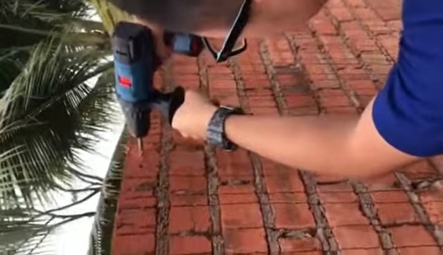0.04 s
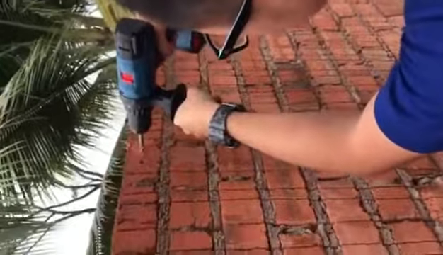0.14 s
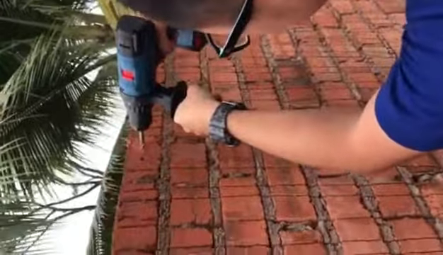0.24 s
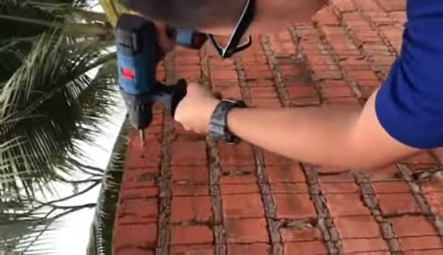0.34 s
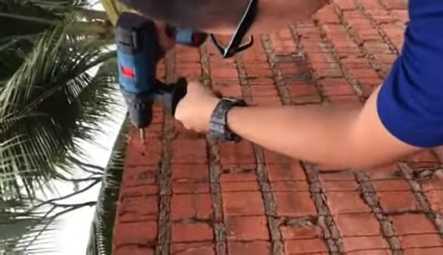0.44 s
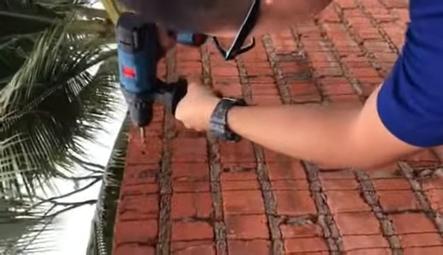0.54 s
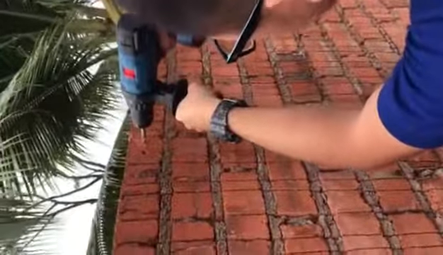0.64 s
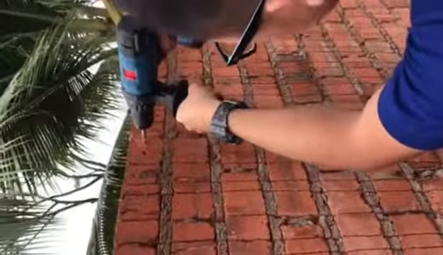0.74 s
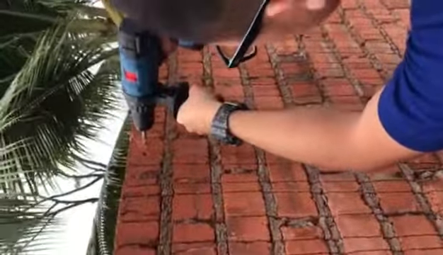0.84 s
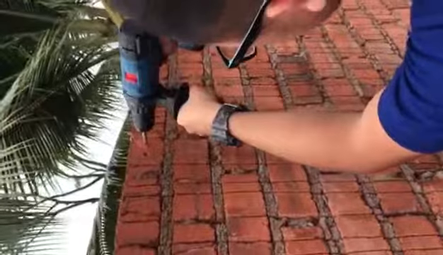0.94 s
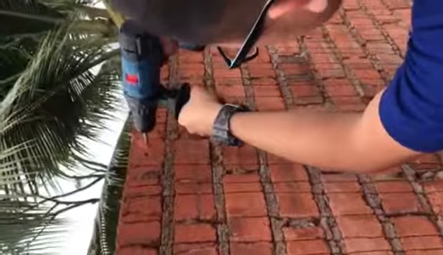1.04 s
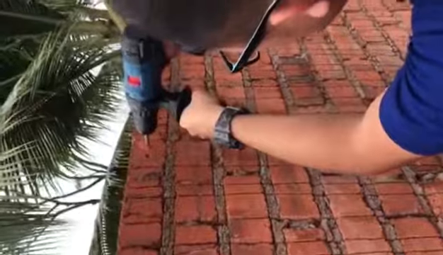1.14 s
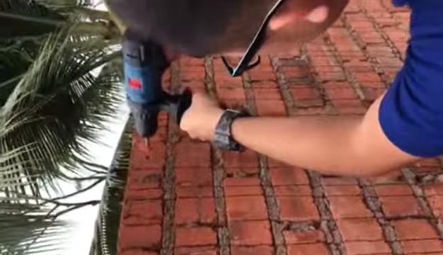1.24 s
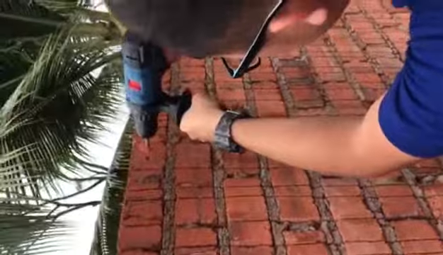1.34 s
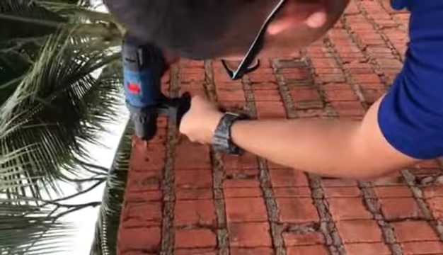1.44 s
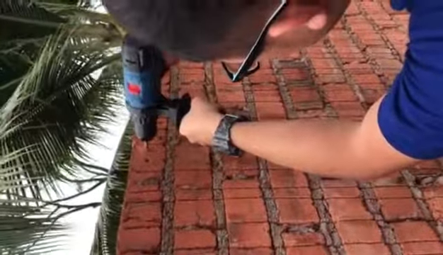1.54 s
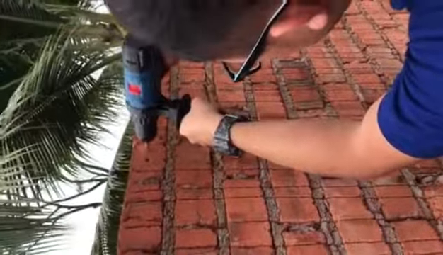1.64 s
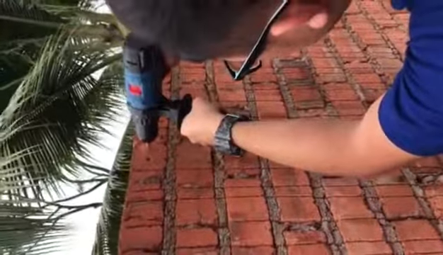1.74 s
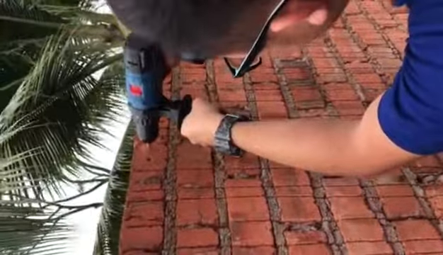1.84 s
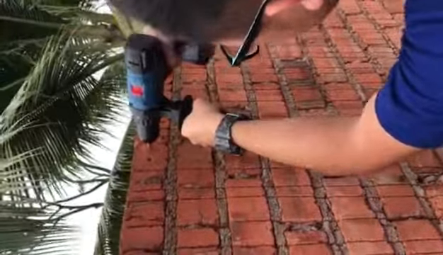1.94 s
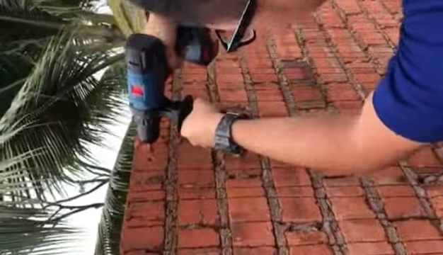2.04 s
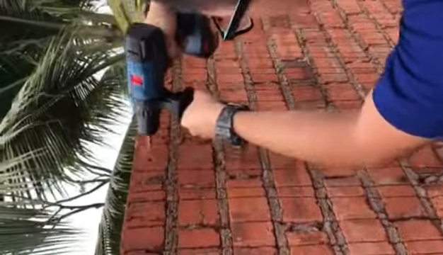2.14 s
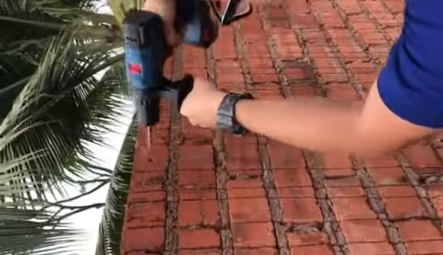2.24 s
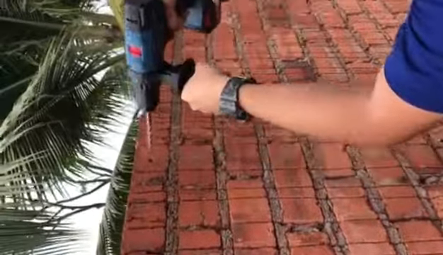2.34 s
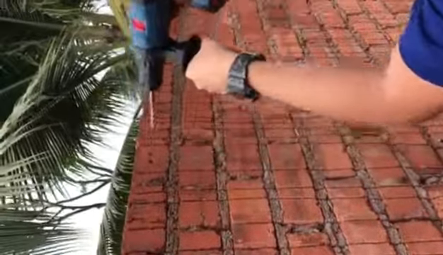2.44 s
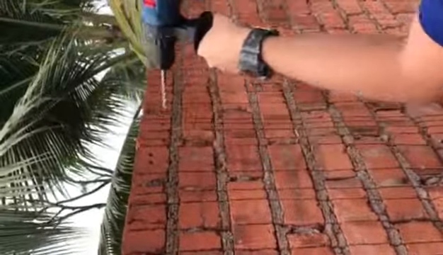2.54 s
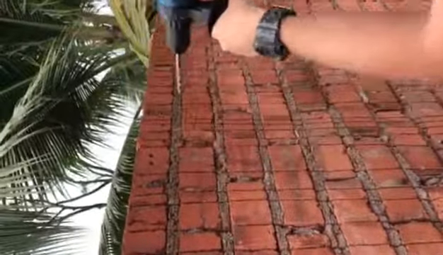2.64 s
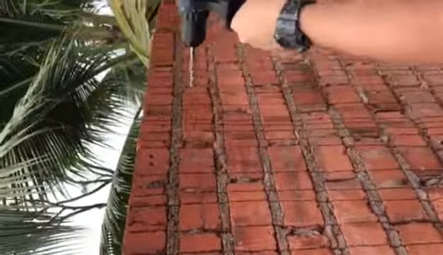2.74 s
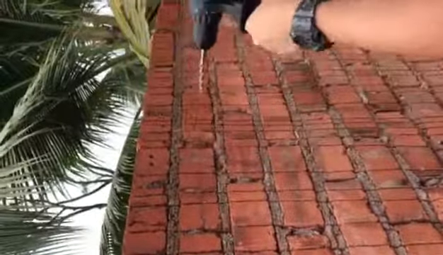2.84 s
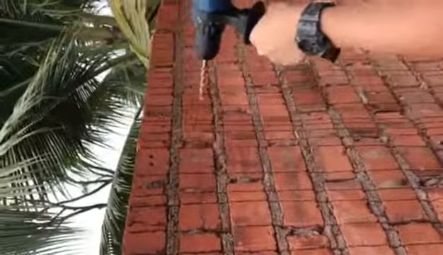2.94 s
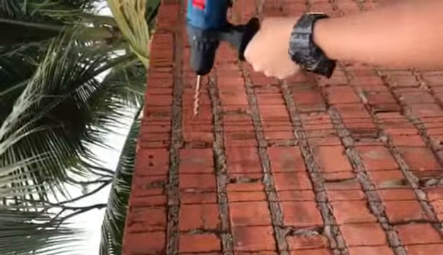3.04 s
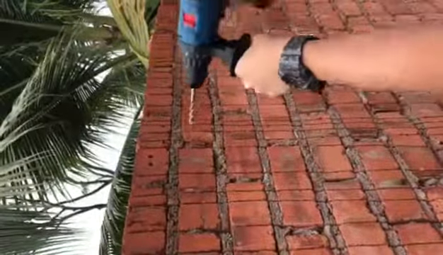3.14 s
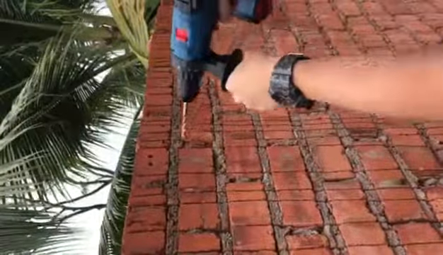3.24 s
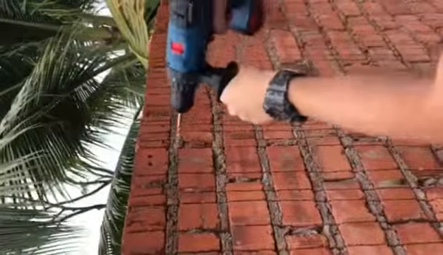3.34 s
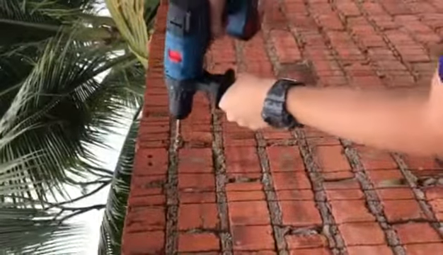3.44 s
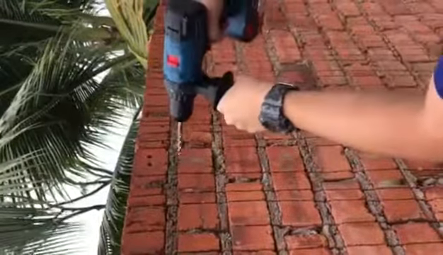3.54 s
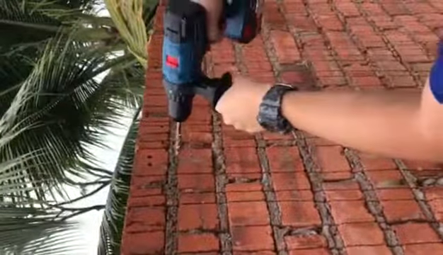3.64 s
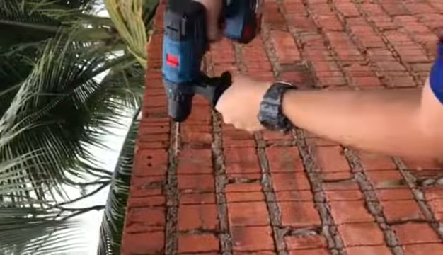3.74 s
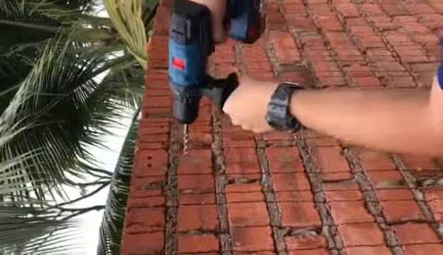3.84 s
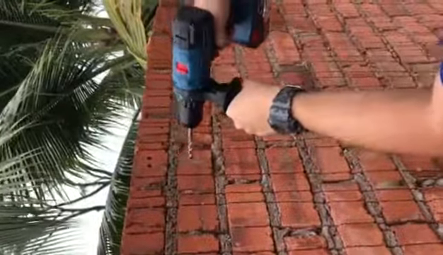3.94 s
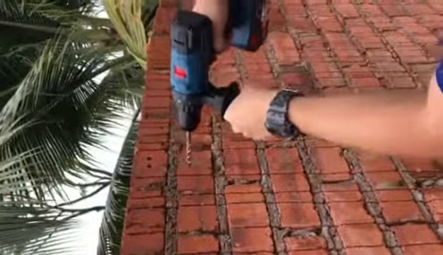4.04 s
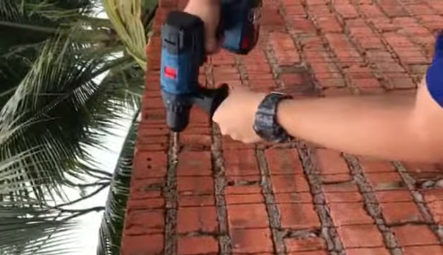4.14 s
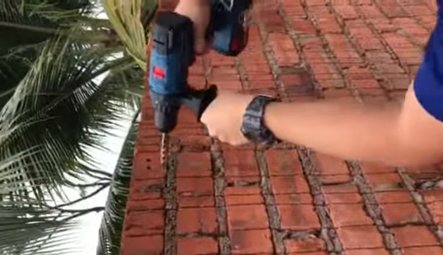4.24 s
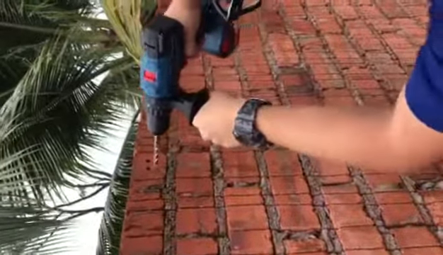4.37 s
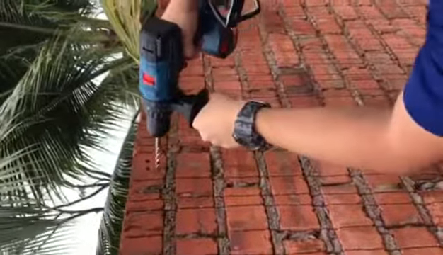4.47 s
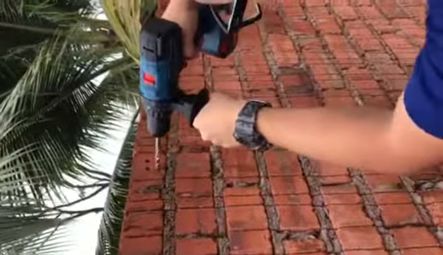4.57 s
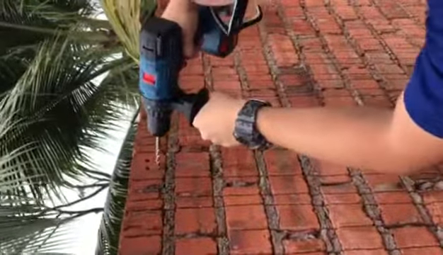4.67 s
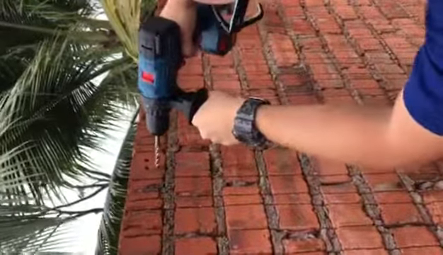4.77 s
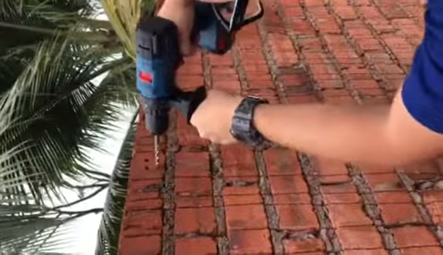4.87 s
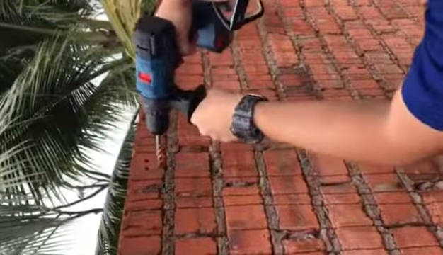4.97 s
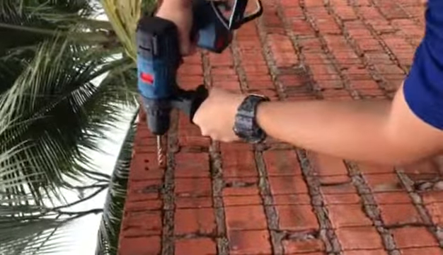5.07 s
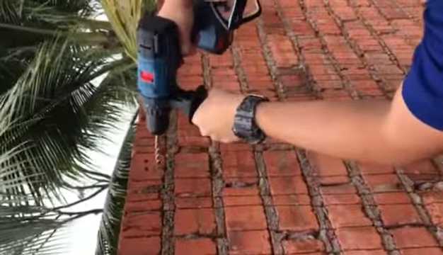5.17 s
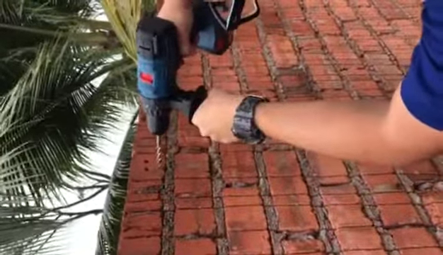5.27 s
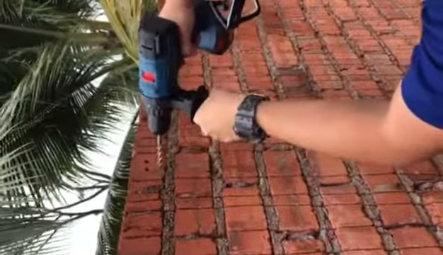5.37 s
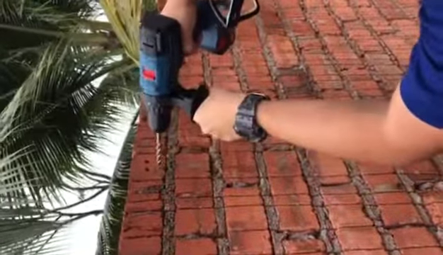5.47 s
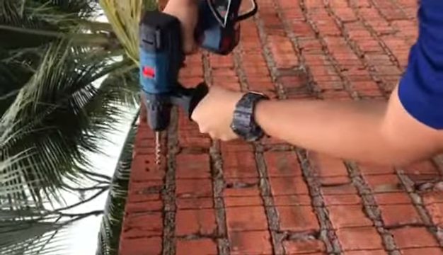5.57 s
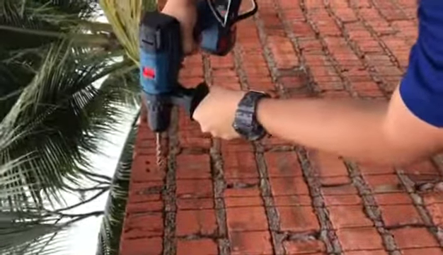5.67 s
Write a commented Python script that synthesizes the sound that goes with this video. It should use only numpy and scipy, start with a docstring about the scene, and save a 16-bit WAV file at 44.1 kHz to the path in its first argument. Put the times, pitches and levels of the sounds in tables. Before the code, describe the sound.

A cordless hammer drill buzzes roughly into brick, pulls free into a smooth high whine, brakes, then after scuffs and clicks whines again.

```python
"""A rough hammering buzz turns into a smooth whine, stops, and after scuffs and clicks the whine returns.
A cordless hammer drill bores into a brick wall outdoors, is pulled out spinning freely and brakes.
Then a shoe scuffs, the trigger clicks and the motor runs without load; a dull boom sounds before it stops.
Ratchet blows ring the drill body while the bit grinds brick. Running free, motor tones that follow the
shaft whine over the noisy rush of fan and gears. Scuff, knocks and boom are shaped noise."""
import sys
import numpy as np
from scipy import signal
from scipy.fft import rfft, irfft
from scipy.io import wavfile

SR = 44100
rng = np.random.default_rng(int(sys.argv[2]) if len(sys.argv) > 2 else 0)


def put_to_file(sound):
    """Save the sound as 16-bit audio at rate SR, in the file named by the first command-line argument."""
    columns = np.atleast_2d(sound).T  # one column per channel
    safe = np.clip(columns, -1, 1)
    whole_steps = np.round(safe * 32767)
    wavfile.write(sys.argv[1], SR, whole_steps.astype(np.int16))


N = 251811
TIME = np.arange(N) / SR

# Speed while the bit bores into the wall, first part. Each row: time in seconds, ratchet blows per second.
EARLY_BORING_SPEED = [(0.02, 608.3), (0.096, 606.3), (0.188, 596.9), (0.306, 600.9), (0.838, 604.7),
                      (1.09, 600.7)]
# Speed while the bit bores on, continuing the rows above. Each row: time in seconds, ratchet blows per second.
LATE_BORING_SPEED = [(1.21, 596.2), (1.33, 596.8), (1.402, 604.0), (1.538, 596.0), (1.728, 598.2),
                     (1.746, 595.1), (1.908, 598.9), (1.95, 603.0)]
# Speed without load, once the bit is pulled out. Each row: time in seconds, pitch of the whine in Hz.
PULLED_OUT_SPEED = [(2.09, 3931), (2.184, 3952), (2.248, 3919), (2.418, 3978), (2.55, 3971)]
# Speed without load in the second run. Each row: time in seconds, pitch of the whine in Hz.
FREE_RUN_SPEED = [(3.66, 3999), (4.998, 4023), (5.134, 3985), (5.48, 3989)]
# Runs of the motor. Each row: trigger pulled in seconds, brake bites in seconds,
# base level of the fan and gear noise in dB.
MOTOR_RUNS = [(-1, 2.621, -27.9), (3.358, 5.551, -28.7)]
# Ways the drill body rings under the blows. Each row: pitch in Hz, width in Hz, base level in dB.
BODY_MODES = [(660, 270, -9), (1250, 123, -0.6), (1787, 103, 0.6), (2462, 200, 2.4), (3044, 510, -3.3),
              (3780, 430, -4), (4200, 110, -8), (4530, 220, -15), (5250, 650, -10), (6050, 220, -10.5),
              (6620, 150, -12), (8420, 240, -13.5)]
# Ways the gearbox rings under the chatter. Each row: pitch in Hz, width in Hz, level in dB.
GEARBOX_MODES = [(1066, 220, -2.5), (1621, 48, 3.5), (2028, 330, -2), (2930, 67, -2.5), (3890, 160, -5)]
# Tones of the motor. Each row: multiple of the shaft speed, base level in dB against the whine.
MOTOR_TONES = [(10, 0), (15, -23), (16, -26.5), (17, -21), (20, -12.5), (22, -11.5), (28, -22), (29, -20),
               (30, -14), (32, -21), (33, -21.5), (34, -30), (40, -5)]
# Hum of the unbalanced rotor at full speed. Each row: multiple of the shaft speed, average level in dB.
ROTOR_TONES = [(1, -57), (2, -55), (3, -55), (4, -51.5)]
# The bit sings up while it spins free. Each row: middle in seconds, level in dB, half length in seconds.
SINGING_SWELLS_TABLE = [(2.19, -37, .11), (2.61, -46, .05), (3.55, -48, .06), (5.44, -46, .19)]
# Soft low bumps as the microphone is handled. Each row: start in seconds, level in dB,
# time to die away by 60 dB in seconds, centre in Hz, spread in octaves.
HANDLING_BUMPS = [(0.12, -36.5, 1, 77.4, 0.3), (0.12, -32, 0.42, 200, 0.51), (1.26, -38, 0.93, 85, 0.4),
                  (1.99, -34.5, 1, 253, 0.36), (2.16, -40, 0.9, 169, 0.3)]
# Knocks of bit, trigger, grip, shoe and gear backlash. Each row: start in seconds, level in dB,
# time to die away by 60 dB in seconds, centre in Hz, spread in octaves.
TOOL_KNOCKS = [(2.222, -29, .04, 5000, 1), (2.829, -43, .06, 2290, 0.37), (3.001, -35, 0.11, 1120, .4),
               (3.054, -32, 0.038, 1500, 0.88), (3.124, -29.5, 0.06, 6500, 1.5),
               (3.15, -33, 0.027, 4500, 1.8), (3.301, -38, .025, 6000, 1.5),
               (3.311, -42, 0.051, 1000, 0.46), (3.361, -22, 0.026, 2570, 0.95),
               (3.375, -20.5, 0.025, 1980, 0.86), (3.416, -32, .03, 3800, 1.2),
               (3.573, -30, 0.068, 810, 0.14)]
# A shoe shifts, then scuffs on gritty ground. Each row: start in seconds, attack in seconds,
# length in seconds, level in dB.
SHOE_SCUFFS = [(2.8, .04, .22, -55), (2.872, .03, .095, -45.5), (3.0, .003, .04, -46),
               (3.052, .003, .085, -34.3)]
# Colour of the grinding. Each row: frequency in Hz, strength in dB per Hz.
GRIND_SPECTRUM = [(60, -22), (170, -3.5), (500, -11), (900, -12), (1500, -6), (2300, 1.5), (2700, -2),
                  (3150, -1.5), (3450, 0), (3850, 5), (5100, -5.5), (6400, 1.2), (7600, -5.5),
                  (11000, -4.5), (14000, -11)]
# Colour of the fan and gears. Each row: frequency in Hz, strength in dB per Hz.
RUSH_SPECTRUM = [(100, -20.5), (550, -14), (850, -6.5), (1200, -3.8), (1450, -4.5), (2450, -3.5),
                 (3300, 0.5), (3800, 4), (4400, -1), (6200, -0.5), (7400, -9), (8700, -1.5), (10400, -10.5),
                 (13800, -2.5)]
# Colour of the scuff. Each row: frequency in Hz, strength in dB per Hz.
SCUFF_SPECTRUM = [(150, -13), (330, -10), (450, -5.5), (620, -6), (780, -13.5), (1100, -6), (1700, -8),
                  (2100, -11.5), (3300, -13.5), (7000, -20), (10000, -20), (13000, -20)]
# Colour of the boom. Each row: frequency in Hz, strength in dB per Hz.
BOOM_SPECTRUM = [(35, -20), (55, 6), (75, -11), (110, -8), (180, -15), (250, -7), (370, -11.5), (520, -19),
                 (750, -16), (950, -28), (3000, -51)]
# Colour of the outdoor rumble. Each row: frequency in Hz, strength in dB per Hz.
OUTDOOR_SPECTRUM = [(30, -19), (42, -19), (58, 3), (80, 0), (120, -8.5), (200, -16.5), (400, -24.5),
                    (850, -24), (1500, -27), (3000, -27), (6000, -34), (14000, -41)]

WHINES_PER_SHAFT_TURN, BLOWS_PER_SHAFT_TURN, BLOWS_PER_CHUCK_TURN = 10, 1.624, 18
CUTOFF_HZ = 14200
# the motor starts softly: time constant, and the power that bends the start into an S
SPIN_UP_S, SOFT_START = .063, 1.3
# as the trigger is let go the speed sags by a share; then the brake stops the shaft
EASE_S, EASE_SHARE, BRAKE_S = .062, .07, .02
# the bit leaves the bottom of the hole: the pressure has gone at LIFT_S, after fading for LIFT_FADE_S
LIFT_S, LIFT_FADE_S = 2.06, .13
# the ratchet hits harder when it runs faster than usual, and softer as the hole deepens
USUAL_BLOWS_PER_S = 600
HAMMER_DB, HAMMER_DB_PER_HZ, HAMMER_DB_PER_S = -18.1, .18, -.7
# grinding grows as the hole deepens
GRIND_DB, GRIND_DB_PER_S = -25.4, .9
# the bit skids once before it seats, and the blows turn irregular: middle and half length
SKID_S, SKID_WIDTH_S = .16, .06
# whine and rush are fainter just after the loud hammering and come up as the recorder's gain recovers
WHINE_DB, WHINE_AFTER_HAMMER_DB, GAIN_RECOVERY_S = -28.7, -7.5, .4
# the housing rings when the whine glides through its resonance
HOUSING_HZ, HOUSING_WIDTH_HZ, HOUSING_DB = 3810, 240, 6.5
# the dull boom: its start, and the deep note at its head (THUD_T60 is its time to die away by 60 dB, in s)
BOOM_S, THUD_HZ, THUD_DB, THUD_T60 = 5.032, 58, -29, .8


def from_db(db):
    """Turns decibels into a plain factor."""
    return 10 ** (np.asarray(db) / 20)


def rms_one(x):
    """Scales a signal to an rms (average strength) of 1."""
    return x / np.sqrt(np.mean(x ** 2) + 1e-20)


def curve(rows):
    """Joins rows of (seconds, value) by straight lines in time."""
    return np.interp(TIME, *np.transpose(rows))


def ramp(start, length):
    """Rises in a straight line from 0 to 1."""
    return np.clip((TIME - start) / length, 0, 1)


def swell(middle, half_length):
    """A smooth rise to 1 and fall."""
    return np.exp(-((TIME - middle) / half_length) ** 2)


def envelope(start, attack, length, t60):
    """Rises, holds until its length is over, then dies away by 60 dB in t60 seconds."""
    age_after_hold = np.maximum(TIME - start - length, 0)
    return ramp(start, attack) * np.exp(-np.log(1000) * age_after_hold / t60)


def drift(rate):
    """Wanders by chance, slower for a lower rate in Hz; rms 1."""
    hz = np.fft.rfftfreq(N, 1 / SR)
    return rms_one(irfft(rfft(rng.standard_normal(N)) / (1 + (hz / rate) ** 2), N))


def coloured(x, spectrum):
    """Shapes x by a spectrum that falls away below its first point; rms 1."""
    hz = np.maximum(np.fft.rfftfreq(N, 1 / SR), 1)
    points, level_db = np.transpose(spectrum)
    gain = from_db(np.interp(np.log(hz), np.log(points), level_db))
    gain = gain * np.minimum(1, hz / points[0]) ** 2
    return rms_one(irfft(rfft(x) * gain * (hz < CUTOFF_HZ), N))


def noise(spectrum):
    """Steady noise of the given colour."""
    return coloured(rng.standard_normal(N), spectrum)


def grains(per_s, spread_db):
    """Random clicks of uneven size; rms 1."""
    sizes = from_db(spread_db * np.minimum(rng.exponential(1, N), 4))
    signed_sizes = sizes * rng.choice([-1, 1], N)
    return rms_one(signed_sizes * (rng.random(N) < per_s / SR))


def resonance(x, hz, width):
    """Rings at one pitch: a two-pole band-pass with gain 1 on top."""
    r = np.exp(-np.pi * width / SR)
    feed = np.array([1, 0, -1]) * (1 - r * r) / 2
    return signal.lfilter(feed, [1, -2 * r * np.cos(2 * np.pi * hz / SR), r * r], x)


def bursts(events, rise=0.00061):
    """Short rattles in one band each, that start sharply and die away."""
    out, hz = np.zeros(N), np.maximum(np.fft.rfftfreq(SR, 1 / SR), 1)
    age = TIME[:SR]
    for s, db, t60, centre, spread in events:
        band = np.exp(-.5 * (np.log2(hz / centre) / spread) ** 2)
        rattle = rms_one(irfft(rfft(rng.standard_normal(SR)) * band, SR))
        shape = (1 - np.exp(-age / rise)) * np.exp(-np.log(1000) * age / t60)
        start = round(s * SR)
        out[start:start + SR] += (from_db(db) * shape * rattle)[:N - start]
    return out


def loaded_speed():
    """Rows of (seconds, ratchet blows per second) while the bit is in the wall."""
    return list(EARLY_BORING_SPEED) + list(LATE_BORING_SPEED)


def full_speed():
    """Shaft turns per second at full trigger: geared to the ratchet, faster once the load is gone."""
    loaded = [(s, blows / BLOWS_PER_SHAFT_TURN) for s, blows in loaded_speed()]
    free_rows = list(PULLED_OUT_SPEED) + list(FREE_RUN_SPEED)
    free = [(s, hz / WHINES_PER_SHAFT_TURN) for s, hz in free_rows]
    return curve(loaded + free)


def throttle(on, off):
    """Share of full speed in one run: spin-up, sag as the trigger is let go, braking."""
    spin_up = 1 - np.exp(-(np.maximum(TIME - on, 0) / SPIN_UP_S) ** SOFT_START)
    sag = 1 - EASE_SHARE * ramp(off - EASE_S, EASE_S) ** 2
    return spin_up * sag * np.exp(-(np.maximum(TIME - off, 0) / BRAKE_S) ** 2)


def shaft_angle(speed, flutter=0.00062):
    """The shaft turns at the given share of full speed, with a slight flutter."""
    return 2 * np.pi * np.cumsum(speed * full_speed() * (1 + flutter * drift(40))) / SR


def drill_body(blows, travel_s=.0003, grip_db=1.0):
    """Blows ring the modes of the body; rms 1."""
    out = 0
    for hz, width, db in BODY_MODES:
        # bending waves in the body: low modes arrive later (travel_s holds at 1 kHz)
        late = travel_s * np.sqrt(10 ** 3 / hz) * SR
        ringing = np.pad(resonance(blows, hz, width), (int(late), 0))[:N]
        # grip and pressure damp each mode a little differently from moment to moment
        out = out + from_db(db + grip_db * drift(3.7)) * ringing
    return rms_one(out)


def ratchet_blows(teeth, bite, uneven_db=1.85, lag_s=.000017, jitter_s=.000009,
                  skid_db=3.5, skid_loss_db=3.0, skid_s=.00006):
    """Ratchet teeth strike the body one after another, unevenly and not quite on time."""
    tooth = np.arange(1, int(teeth[-1]) - 2)
    chance = rng.standard_normal((N, 2))[tooth]
    skid = np.interp(tooth, teeth, swell(SKID_S, SKID_WIDTH_S))
    # the changing drag makes the blows come early and late in turn
    late = lag_s * np.cos(2 * np.pi * tooth / BLOWS_PER_CHUCK_TURN)
    late = late + (jitter_s + skid_s * skid) * chance[:, 0]
    at = np.clip(np.interp(tooth, teeth, np.arange(N)) + late * SR, 0, N - 2)
    force = from_db((uneven_db + skid_db * skid) * chance[:, 1] - skid_loss_db * skid)
    # a blow that falls between two samples is shared by both
    whole, part = at.astype(int), at % 1
    blows = np.bincount(whole, force * (1 - part), N) + np.bincount(whole + 1, force * part, N)
    return blows * bite


def hammer(wobble_db=1.0, flutter=0.002, grit_pulsing=0.22, crumble_db=-0.75):
    """Ratchet blows ring the body while the bit crushes brick, until the pressure is gone."""
    teeth = np.cumsum(full_speed() * BLOWS_PER_SHAFT_TURN * (1 + flutter * drift(24.9))) / SR
    chuck = 2 * np.pi * teeth / BLOWS_PER_CHUCK_TURN
    # the two cutting edges bite harder once and twice in each turn of the chuck
    bite = from_db(wobble_db * (np.sin(chuck) + 0.62 * np.sin(2 * chuck)))
    buzz = drill_body(ratchet_blows(teeth, bite))
    buzz = buzz / buzz[TIME < LIFT_S].std()
    extra_blows = curve(loaded_speed()) - USUAL_BLOWS_PER_S
    buzz_db = HAMMER_DB + HAMMER_DB_PER_HZ * extra_blows + HAMMER_DB_PER_S * TIME
    crushing = grains(14000, 2.5) * bite * (1 + grit_pulsing * np.sin(2 * np.pi * teeth))
    grind = coloured(crushing * from_db(crumble_db * drift(90)), GRIND_SPECTRUM)
    grind_db = GRIND_DB + GRIND_DB_PER_S * TIME
    pressure = 1 - ramp(LIFT_S - LIFT_FADE_S, LIFT_FADE_S)
    return pressure * (from_db(buzz_db) * buzz + from_db(grind_db) * grind)


def motor(angle, speed, speed_power=2.0, lag_s=.058, fade_in_s=.035,
          shimmer_db=0.4, overtone_shimmer_db=2.6, swell_db=2.0):
    """Under power the commutator whines at ten times the shaft speed, with weaker tones around it."""
    power = sum(envelope(on + lag_s, fade_in_s, off - on - lag_s, .02) for on, off, _ in MOTOR_RUNS)
    recovery_db = WHINE_AFTER_HAMMER_DB * (1 - ramp(LIFT_S, GAIN_RECOVERY_S))
    # distance of the whine from the housing's resonance, in half widths
    detuning = 2 * (WHINES_PER_SHAFT_TURN * speed * full_speed() - HOUSING_HZ) / HOUSING_WIDTH_HZ
    tones = 0
    for multiple, db in MOTOR_TONES:
        order = round(multiple)
        if order == WHINES_PER_SHAFT_TURN:
            housing_db = HOUSING_DB / (1 + detuning ** 2)
            gain = speed ** speed_power * from_db(db + housing_db + shimmer_db * drift(8.7))
        else:   # the weaker tones swell and fade slowly, each by chance
            gain = from_db(db + overtone_shimmer_db * drift(16) + swell_db * drift(0.88))
        tones = tones + gain * np.sin(order * angle + rng.uniform(0, 2 * np.pi))
    return np.sqrt(2) * from_db(WHINE_DB + recovery_db) * power * tones


def fan_and_gears(angle, speed_power=.55, after_hammer_db=-3.5, recovery_s=.15, strain_db=3.0, strain_s=.16,
                  throb=0.31, rattle_db=-1.0):
    """Air and gear chatter pulse twice in each shaft turn and ring the gearbox, louder at each start."""
    level = 0
    for on, off, db in MOTOR_RUNS:
        level = level + throttle(on, off) ** speed_power * from_db(db + strain_db * swell(on, strain_s))
    level = level * from_db(after_hammer_db * (1 - ramp(LIFT_S, recovery_s)))
    chatter = grains(20000, 2.1) * (1 + throb * np.sin(2 * angle)) * from_db(rattle_db * drift(80))
    ringing = sum(from_db(db) * resonance(chatter, hz, width) for hz, width, db in GEARBOX_MODES)
    return level * coloured(chatter + ringing, RUSH_SPECTRUM)


def singing(speed, ring_hz=770, wander=0.0127, waver_db=2.5, steady_db=-60):
    """One narrow mode of the bit, shaken by the gears: a faint wavering tone that swells at times."""
    turns = np.cumsum(ring_hz * (1 + wander * drift(39))) / SR
    swells = sum(from_db(db) * swell(s, half) for s, db, half in SINGING_SWELLS_TABLE)
    level = np.sqrt(speed) * (from_db(steady_db) + swells)
    return level * from_db(waver_db * drift(29)) * np.sqrt(2) * np.sin(2 * np.pi * turns)


def rotor(angle, speed, waver_db=1.5):
    """The unbalance hum of the free rotor grows steeply with speed."""
    running = ramp(LIFT_S, LIFT_FADE_S) * speed ** 4
    hum = 0
    for multiple, db in ROTOR_TONES:
        hum = hum + from_db(db + waver_db * drift(24)) * np.sin(round(multiple) * angle)
    return np.sqrt(2) * running * hum


def brushes(centre_hz=13000, start_db=-30, start_lag_s=.04, start_t60=.3, start_octaves=.21,
            brake_db=-12, brake_t60=.039, brake_octaves=.45):
    """The brushes spit when the brake bites and fizz under the starting current."""
    brakes = [(off, brake_db, brake_t60, centre_hz, brake_octaves) for _, off, _ in MOTOR_RUNS]
    # a run already going at time 0 has no start to hear
    starts = [(on + start_lag_s, start_db, start_t60, centre_hz, start_octaves)
              for on, _, _ in MOTOR_RUNS if on > 0]
    return bursts(starts, rise=.005) + bursts(brakes, rise=.00065)


def scuff(release_t60=.11):
    """Grit slips under a sole: a crowd of tiny clicks."""
    level = 0
    for s, attack, length, db in SHOE_SCUFFS:
        level = level + from_db(db) * envelope(s, attack, length, release_t60)
    return level * coloured(grains(5000, 2.1), SCUFF_SPECTRUM)


def boom(rumble_db=-25, attack_s=.008, hold_s=.06, t60=.7, tail_db=-42, tail_s=.46, tail_t60=.4,
         slap_db=-29, slap_t60=.25, slap_hz=1500, slap_octaves=2.2):
    """A slap and a deep thud, with a rumble that leaves a low tail."""
    age = np.maximum(TIME - BOOM_S, 0)
    thud = np.sin(2 * np.pi * THUD_HZ * age) * envelope(BOOM_S, attack_s, 0, THUD_T60)
    rumble_level = from_db(rumble_db) * envelope(BOOM_S, attack_s, hold_s, t60)
    tail_level = from_db(tail_db) * envelope(BOOM_S, attack_s, tail_s, tail_t60)
    rumble = (rumble_level + tail_level) * noise(BOOM_SPECTRUM)
    slap = bursts([(BOOM_S, slap_db, slap_t60, slap_hz, slap_octaves)], rise=.003)
    return slap + from_db(THUD_DB) * thud + rumble


def yard(x, t60=0.065, wet_db=-15):
    """Wall and ground scatter a short tail."""
    age = TIME[:SR // 3]
    tail = rng.standard_normal(len(age)) * np.exp(-np.log(1000) * age / t60) * (age > .004)
    return x + from_db(wet_db) * signal.fftconvolve(x, tail / np.linalg.norm(tail))[:N]


def scene(outdoors_db=-46):
    """Drill and feet close by, over the rumble of distant traffic; both channels are alike."""
    speed = sum(throttle(on, off) for on, off, _ in MOTOR_RUNS)
    angle = shaft_angle(speed)
    drill = hammer() + motor(angle, speed) + fan_and_gears(angle)
    drill = drill + singing(speed) + rotor(angle, speed) + brushes()
    knocks_and_feet = bursts(TOOL_KNOCKS) + scuff()
    microphone_bumps = bursts(HANDLING_BUMPS, rise=0.011)
    far = boom() + from_db(outdoors_db) * noise(OUTDOOR_SPECTRUM)
    mono = yard(drill + knocks_and_feet) + microphone_bumps + far
    return np.array([mono, mono])


def record(dry, top=0.6):
    """The tallest peaks are rounded and the highest treble is cut steeply."""
    rounded = dry / (1 + (dry / top) ** 4) ** (1 / 4)
    treble_cut = signal.ellip(10, .05, 60, CUTOFF_HZ, fs=SR, output="sos")
    return signal.sosfiltfilt(treble_cut, rounded)


dry = scene()
out = record(dry)
put_to_file(out)
```